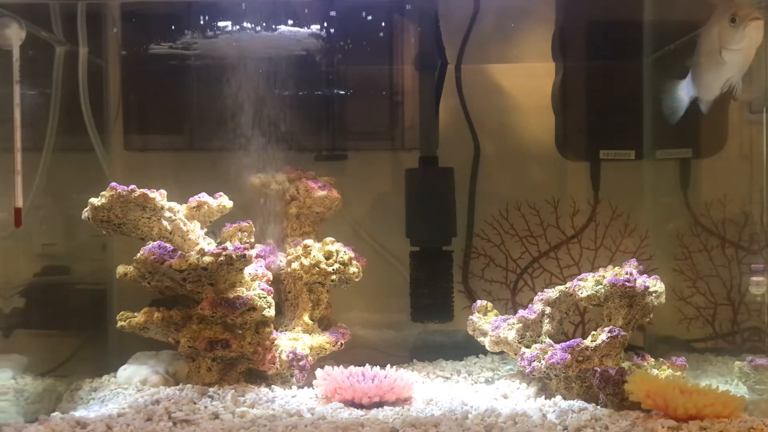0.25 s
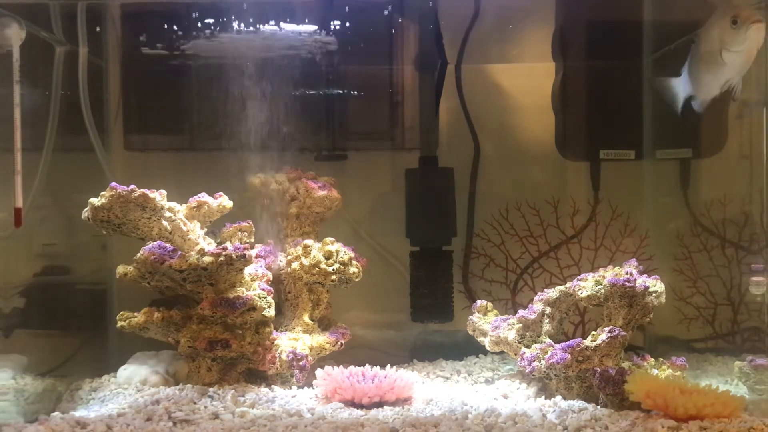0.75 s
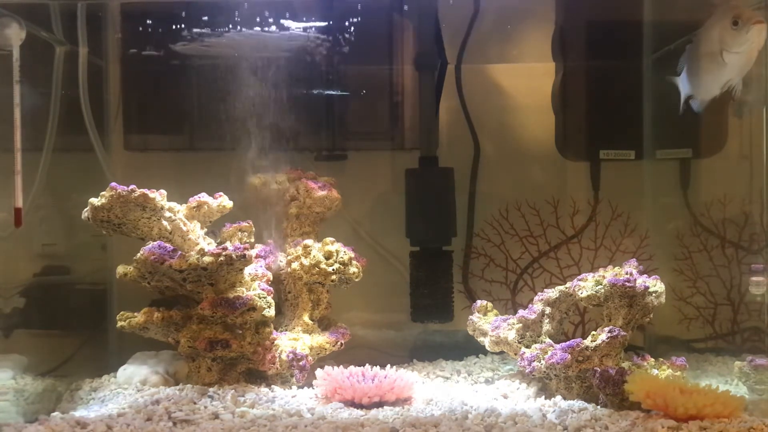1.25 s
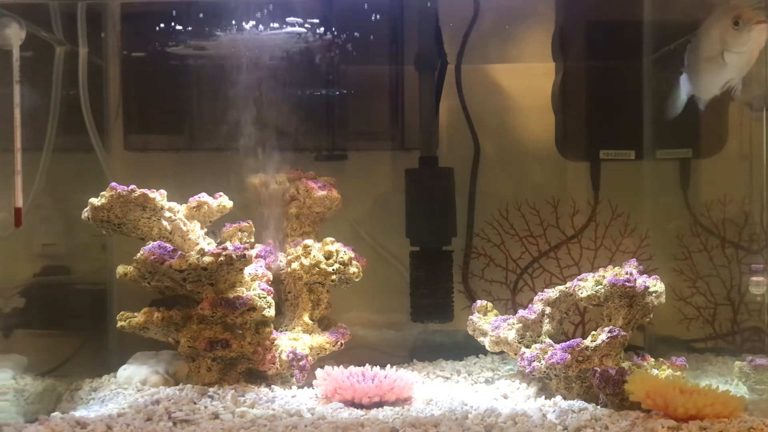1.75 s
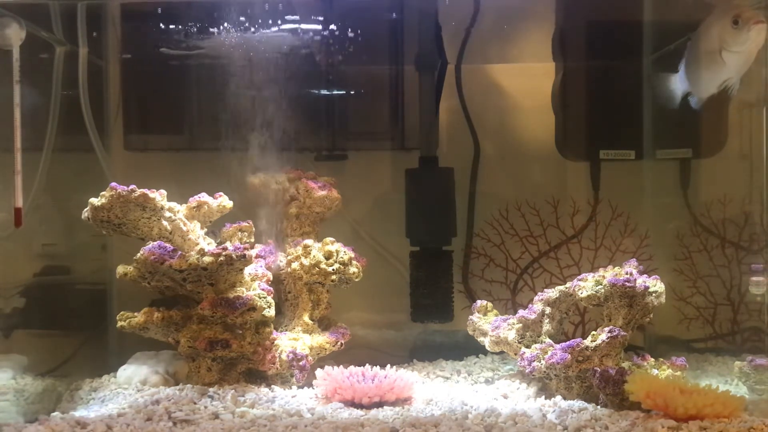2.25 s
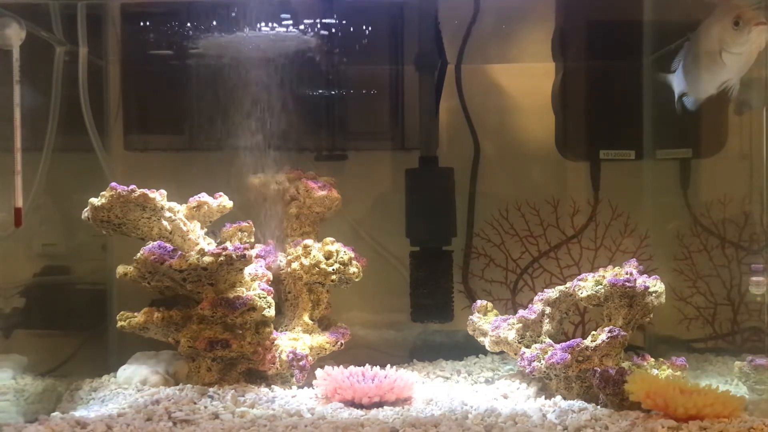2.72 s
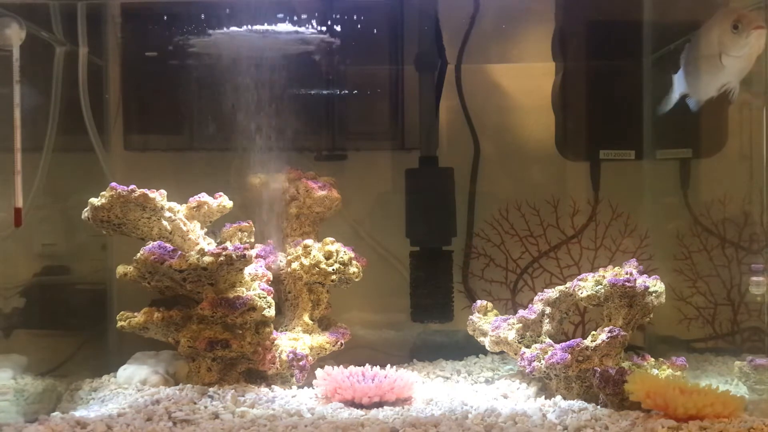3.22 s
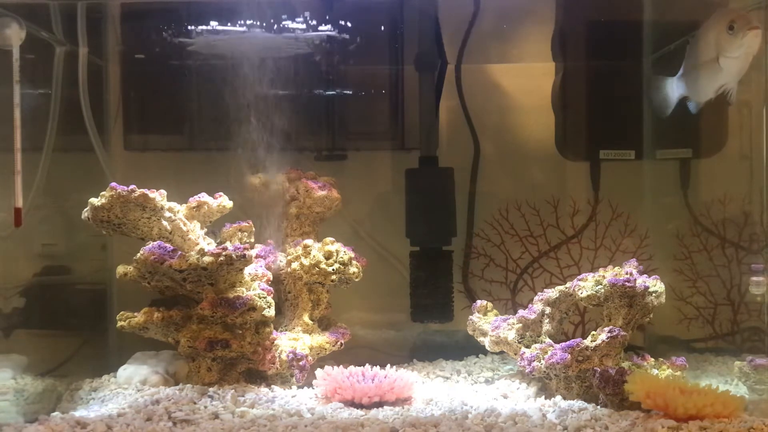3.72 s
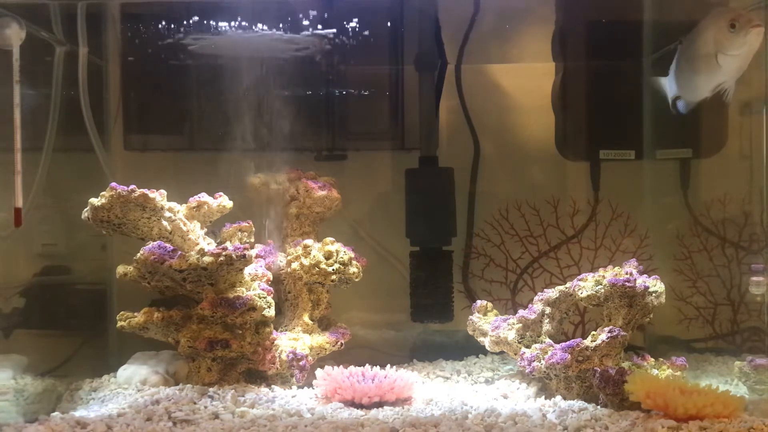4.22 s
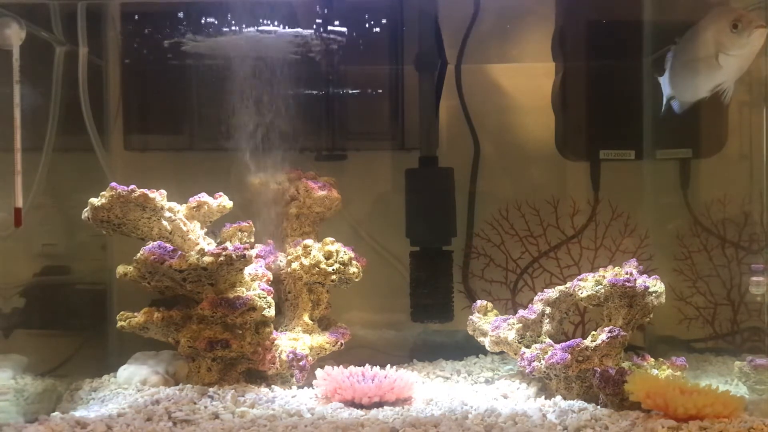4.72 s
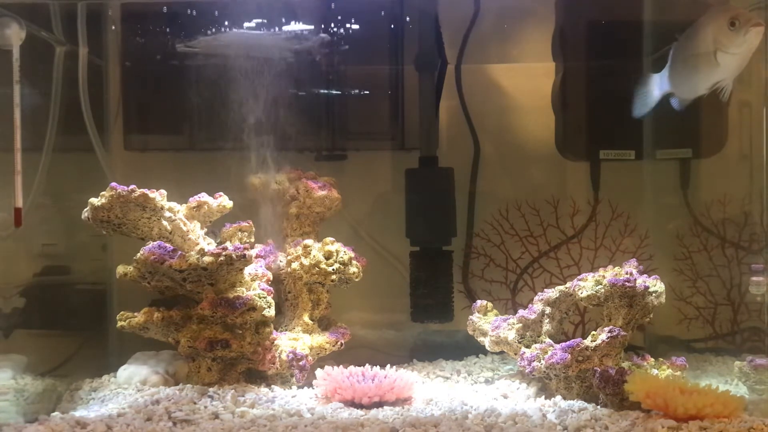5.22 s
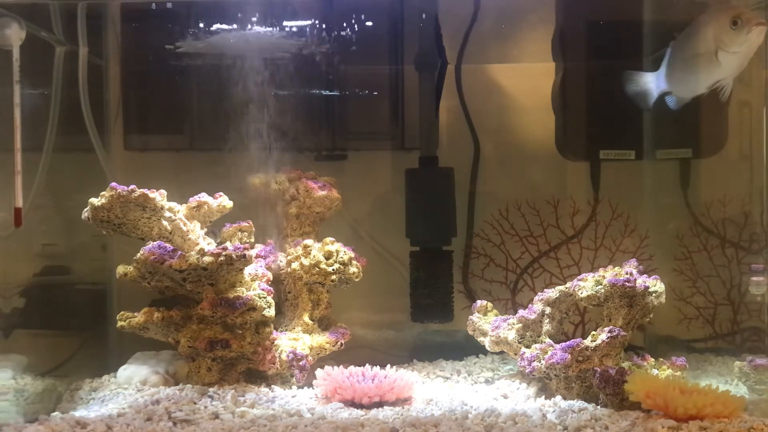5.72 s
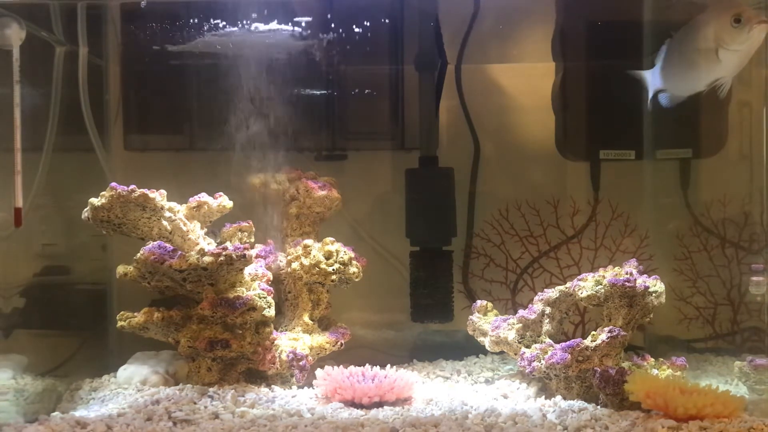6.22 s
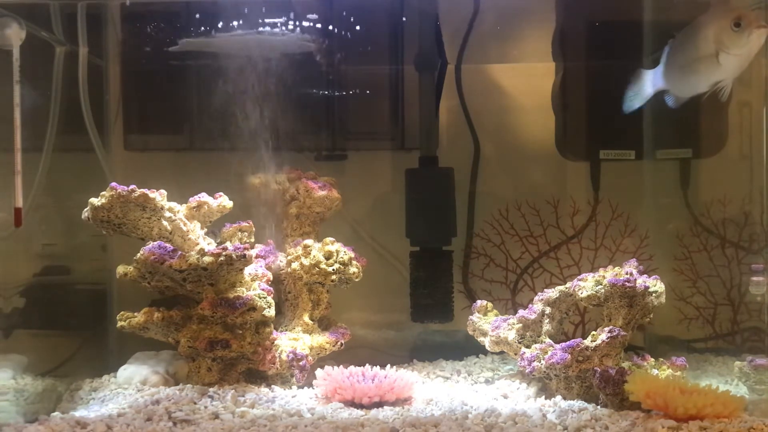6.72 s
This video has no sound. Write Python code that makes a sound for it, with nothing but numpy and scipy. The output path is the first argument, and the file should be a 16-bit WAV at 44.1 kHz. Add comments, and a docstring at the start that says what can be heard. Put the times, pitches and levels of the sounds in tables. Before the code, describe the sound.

A fish tank's air pump gives a low, steady hum with a slight buzz throughout. Behind it, small bubbles simmer faintly at the water's surface, and larger ones pop at irregular moments with light, ringing plips that echo briefly in the tank. Two soft, deep bumps and a few tiny fizzes pass in the first half or so. The microphone seems near the tank, in a quiet room with a low rumble and even hiss.

```python
"""A low, steady hum comes first: a fish tank's air pump, shaken by mains power, its valves buzzing.
Its air rises from an air stone and simmers at the surface, each small bubble ringing briefly.
Now and then a larger bubble plips under the lid and echoes in the tank and the quiet room.
Beneath it lie a second motor's faint tones, a low rumble, an even hiss and a thin whine.
Two soft bumps and a few brief fizzes pass by."""
import sys
import numpy as np
from scipy import signal
from scipy.fft import rfft, irfft
from scipy.io import wavfile

SR = 44100
rng = np.random.default_rng(int(sys.argv[2]) if len(sys.argv) > 2 else 0)


def bounce(signal):
    """Save signal as a 16-bit WAV file at the path given by the first command-line argument."""
    frames = np.transpose(np.atleast_2d(signal))
    limited = np.clip(frames, -1, 1)
    pcm = np.round(limited * 32767).astype(np.int16)
    wavfile.write(sys.argv[1], SR, pcm)


N = 306555
T = np.arange(N) / SR
FREQS = np.arange(N // 2 + 1) * SR / N + 1e-3  # the tiny offset avoids dividing by zero

# tones in the pump's hum (multiple of the stroke rate, relative level [dB])
HUM_TONES = [(1, -16.5), (2, 2), (3, -17), (4, -35), (5, -19), (6, -18.5), (7, -36.5), (8, -21.5), (9, -52),
             (10, -18.5), (11, -29.5), (12, -35.5), (13, -24.5), (14, -29.5), (15, -33.5), (16, -33),
             (17, -33), (18, -31)]
# pitches at which the pump's case rings (pitch [Hz], width [Hz], gain [dB])
CASE_RESONANCES = [(1051, 43, 11), (1510, 44, -9), (1644, 100, -11)]
# tones of a second small motor (pitch [Hz], level [dB])
MOTOR_TONES = [(116.5, -85), (127.7, -77.5), (383, -82.5), (641, -79.5), (680, -99)]
# strength of the bubbling as it builds and slackens (time [s], relative level [dB])
BUBBLING_STRENGTH = [(0, -73), (3.1, -72), (4.7, -72.5), (5.6, -74.5), (6.3, -73), (6.95, -74.5)]
# pitches at which the air between water and lid rings (pitch [Hz], width [Hz], gain [dB])
LID_RESONANCES = [(985, 49, 3.5), (1040, 46, 0), (1133, 90, -4), (1252, 51, -4), (1401, 150, -3.5),
                  (1843, 140, -1)]
# low room rumble (frequency [Hz], level [dB per Hz])
RUMBLE_SPECTRUM = [(18, -108), (29, -97), (42, -85), (54, -71), (65, -76.5), (92, -81), (112, -89),
                   (200, -115), (600, -150)]
# steady room air (frequency [Hz], level [dB per Hz])
AIR_SPECTRUM = [(20, -115), (110, -90.5), (170, -95), (212, -91), (330, -96.5), (690, -99), (790, -103.5),
                (1600, -112), (4000, -135)]
# even hiss (frequency [Hz], level [dB per Hz])
HISS_SPECTRUM = [(900, -106), (1900, -106), (3000, -110.2), (4550, -109), (4900, -113.5), (5800, -110.3),
                 (7100, -112.3), (7700, -114.7), (8300, -112.3), (9600, -112), (10400, -115.7),
                 (11600, -112.3), (13200, -111.6), (15800, -114)]
# thin electrical whine (pitch [Hz], width [Hz], level [dB])
WHINE_BANDS = [(5770, 14, -94), (11400, 110, -87.5), (14100, 220, -99)]
# larger bubbles (time [s], relative peak level [dB], pitch [Hz])
LARGE_BUBBLES = [(0.674, -51, 1080), (0.794, -53, 1250), (1.1765, -49.5, 1240), (1.6355, -53, 991),
                 (2.1086, -50, 1000), (2.3297, -53, 1010), (2.9918, -49.5, 1020), (3.246, -51, 1240),
                 (3.7486, -47, 1190), (4.0013, -54.5, 1250), (4.2195, -48.5, 1100), (4.3361, -49.5, 1230),
                 (4.471, -51, 1230), (4.6895, -49, 1150), (5.859, -56, 1240), (6.0868, -51.5, 1250),
                 (6.328, -53, 1220), (6.5575, -52.5, 1180)]
# soft low bumps (time [s], peak level [dB])
LOW_BUMPS = [(0.974, -43), (2.715, -43.5)]
# brief soft fizzes (time [s], length [s], centre [Hz], width [Hz], level [dB])
SOFT_FIZZES = [(1.521, .008, 13800, 3500, -66), (1.534, .005, 13800, 3500, -70),
               (3.377, 0.065, 4500, 3170, -68.5), (3.505, .03, 5200, 3000, -71.5)]


def gain(db):
    """Turn decibels into a number to multiply by."""
    return 10 ** (np.asarray(db) / 20)


def set_level(x, db):
    """Scale a sound to an average (rms) level."""
    return x * gain(db) / np.sqrt(np.mean(x ** 2))


def wander(rate_hz):
    """A smooth random wobble of typical size 1; a higher rate wobbles faster."""
    return set_level(irfft(rfft(rng.standard_normal(N)) * np.exp(-(FREQS / rate_hz) ** 2), N), 0)


def resonate(x, hz, width):
    """Keep the sound near one pitch and weaken the rest."""
    return irfft(rfft(x) / (1 + 1j * (FREQS ** 2 - hz ** 2) / (FREQS * width)), N)


def ring(x, resonances):
    """Let a sound ring at several pitches at once."""
    return sum(gain(db) * resonate(x, hz, width) for hz, width, db in resonances)


def noise_band(hz, width):
    """Noise around one pitch, with an average (rms) size of 1."""
    return set_level(resonate(resonate(rng.standard_normal(N), hz, width), hz, width), 0)


def shaped_noise(spectrum):
    """Noise whose strength from low to high follows a table."""
    hz, db = np.transpose(spectrum)
    shape = gain(np.interp(np.log(FREQS), np.log(hz), db)) * np.sqrt(SR / 2)
    return irfft(rfft(rng.standard_normal(N)) * shape, N)


def swell(peak_s, length_s):
    """A smooth rise and fall around one moment."""
    return np.exp(-np.minimum((2 * (T - peak_s) / length_s) ** 2, 20))


def add(out, start_s, x):
    """Mix the sound x into out at a given time."""
    start = int(np.clip(start_s * SR, 0, N - 1))
    out[start:start + len(x)] += x[:N - start]


def pump_hum(strokes, waver=0.01, upper_waver=0.11):
    """A magnet shakes the diaphragm, a flexible sheet; air pushing back makes the upper tones waver."""
    out = 0
    for multiple, db in HUM_TONES:
        depth = waver + upper_waver * min(abs(multiple - 2) / 10, 1)  # the magnet's tone, 2, is steadiest
        loudness = gain(db) * (1 + depth * wander(3.7))
        out = out + loudness * np.sin(2 * np.pi * (multiple * strokes + rng.random()))
    return set_level(out, db=-48)


def pump_valves(strokes, outlet_db=-4, open_share=0.12):
    """The inlet and outlet valves each flap once a stroke; with a puff of air they ring the case."""
    inlet = np.exp(-(strokes % 1) / open_share)
    outlet = gain(outlet_db) * np.exp(-((strokes + .6) % 1) / open_share)
    opening = inlet + outlet
    flaps = set_level(np.maximum(np.diff(opening, prepend=opening[0]), 0), db=0)  # a click on opening
    puffs = set_level(opening * rng.standard_normal(N), db=3)
    return set_level(ring(flaps + puffs, CASE_RESONANCES), db=-75)


def small_motor(waver_cycles=0.32):
    """A second small motor adds faint, unsteady tones."""
    return sum(gain(db) * np.sqrt(2) * np.sin(2 * np.pi * (hz * T + waver_cycles * wander(1.63)))
               for hz, db in MOTOR_TONES)


def bubble(hz, fade_s, rise_s, glide):
    """A bubble starts ringing quickly, then fades 60 dB in fade_s as its pitch creeps upward."""
    t = T[:int(fade_s * SR) + 2]
    loudness = (1 - np.exp(-(t / rise_s) ** 2)) * gain(-60 * t / fade_s)
    return loudness / loudness.max() * np.sin(2 * np.pi * hz * t * (1 + glide * t / fade_s))


def simmer(count, centre_hz, spread, scatter_db, cycles, db):
    """Small bubbles reach the surface at random times; the smaller they are, the higher they ring."""
    out = np.zeros(N)
    for when, smallness, strength in rng.random((count, 3)):
        hz = centre_hz * (smallness / (1 - smallness) + 0.0014) ** spread
        ping = bubble(hz, fade_s=cycles / hz, rise_s=1 / hz, glide=0.068)
        add(out, when * N / SR, gain(scatter_db * strength) * ping)
    return set_level(out, db)


def water_surface(surge_db=0.8, surge_hz=6.2):
    """The bubbles surge gently: their gurgle rings the air under the lid, and finer spray ticks above."""
    flow_db = np.interp(T, *np.transpose(BUBBLING_STRENGTH)) + surge_db * wander(surge_hz)
    gurgle = simmer(count=6000, centre_hz=1197, spread=0.083, scatter_db=2.5, cycles=16, db=0)
    spray = simmer(count=2500, centre_hz=1950, spread=0.13, scatter_db=18, cycles=14, db=-15)
    ringing_gurgle = set_level(ring(gurgle, LID_RESONANCES), db=4)
    return (ringing_gurgle + spray) * gain(flow_db)


def tank_echoes(x, lid_fade_s=0.13, lid_db=-9, room_fade_s=0.31, room_db=-11):
    """Sound bounces between water, glass and lid, and lingers a little longer in the room."""
    t = T[:SR // 2]
    out = x
    for fade_s, db in ((lid_fade_s, lid_db), (room_fade_s, room_db)):
        echoes = rng.standard_normal(len(t)) * gain(-60 * t / fade_s) * (t > .006)
        out = out + gain(db) * signal.fftconvolve(x, echoes / np.linalg.norm(echoes))[:N]
    return out


def room_background(flicker_db=0.72):
    """The quiet room: low rumble, steady air, a slightly flickering hiss and an electrical whine."""
    hiss = shaped_noise(HISS_SPECTRUM) * gain(flicker_db * wander(23))
    whine = sum(gain(db) * noise_band(hz, width) for hz, width, db in WHINE_BANDS)
    return shaped_noise(RUMBLE_SPECTRUM) + shaped_noise(AIR_SPECTRUM) + hiss + whine


def plips(boost_db=1.0):
    """Larger bubbles burst one at a time, each with a short ringing note."""
    out = np.zeros(N)
    for start_s, db, hz in LARGE_BUBBLES:
        add(out, start_s, gain(db + boost_db) * bubble(hz, fade_s=0.032, rise_s=0.00068, glide=0.02))
    return out


def bumps(length_s=0.069, hz=53):
    """Two soft bumps, each a deep tone that swells and fades."""
    return sum(gain(db) * swell(peak_s, length_s) * np.cos(2 * np.pi * hz * (T - peak_s))
               for peak_s, db in LOW_BUMPS)


def fizzes():
    """A few soft fizzes, each a brief swell of high noise."""
    return sum(gain(db) * swell(peak_s, length_s) * noise_band(hz, width)
               for peak_s, length_s, hz, width, db in SOFT_FIZZES)


def scene(stroke_hz=49.958):
    """Pump, water and room, mixed into one channel."""
    strokes = stroke_hz * T + 0.0048 * wander(3.5)  # strokes so far; the mains timing drifts a little
    machines = pump_hum(strokes) + pump_valves(strokes) + small_motor()
    water = tank_echoes(water_surface() + plips())
    return (machines + water + room_background() + bumps() + fizzes())[None]


def record(dry, top_hz=15780):
    """Cut away the very highest treble steeply."""
    return signal.sosfilt(signal.ellip(12, .1, 80, top_hz, fs=SR, output="sos"), dry)


dry = scene()
out = record(dry)
bounce(out)
```